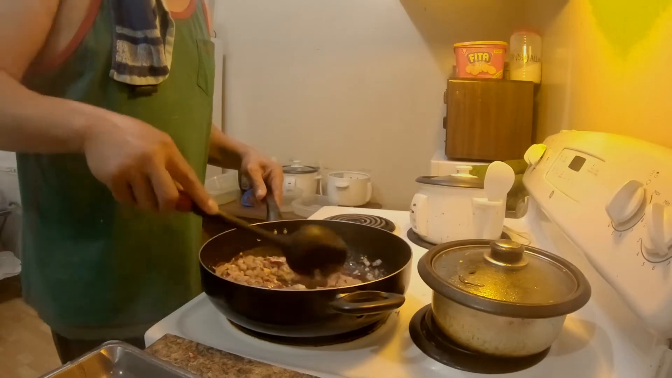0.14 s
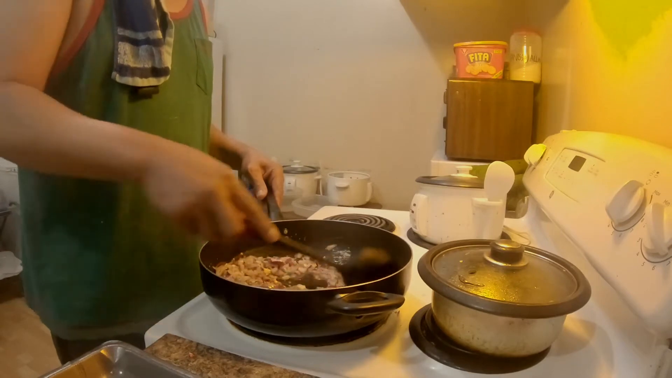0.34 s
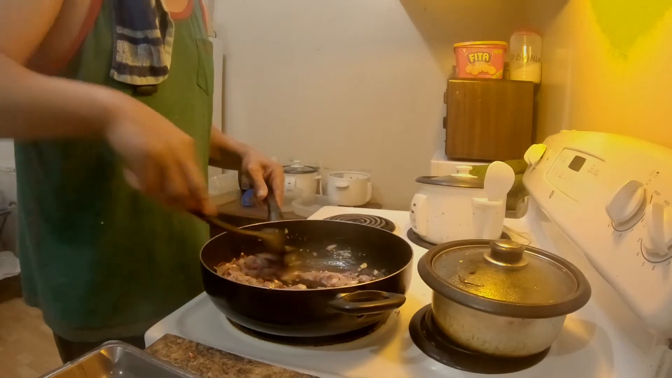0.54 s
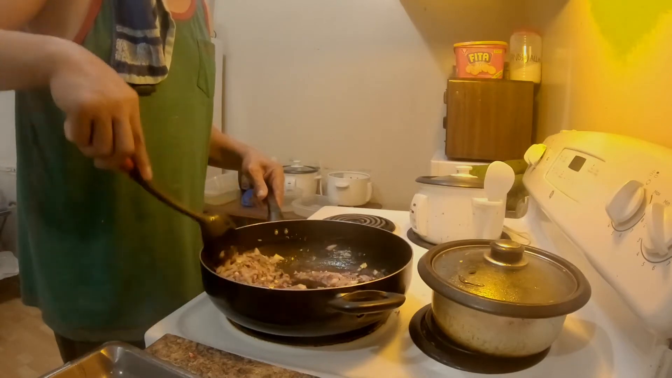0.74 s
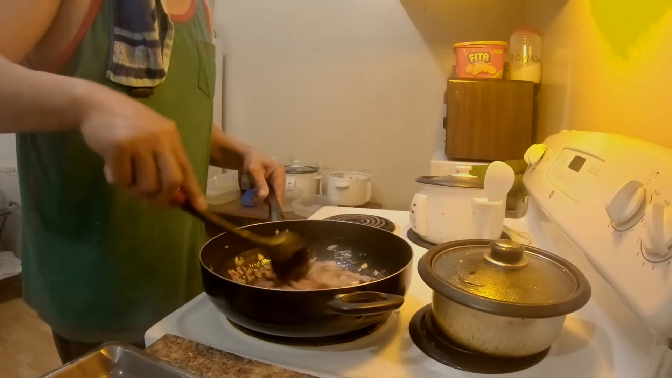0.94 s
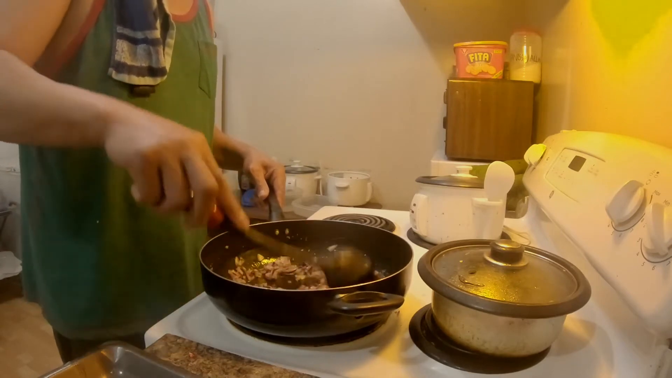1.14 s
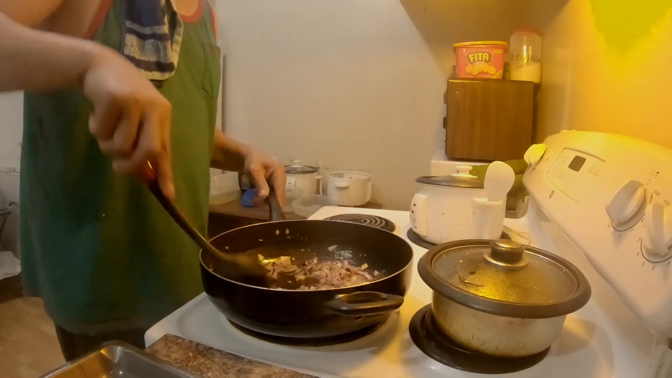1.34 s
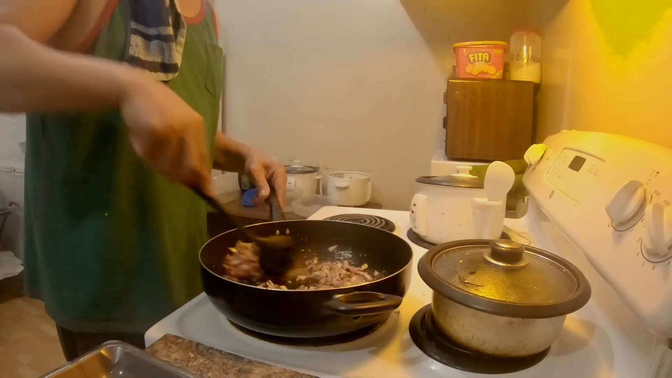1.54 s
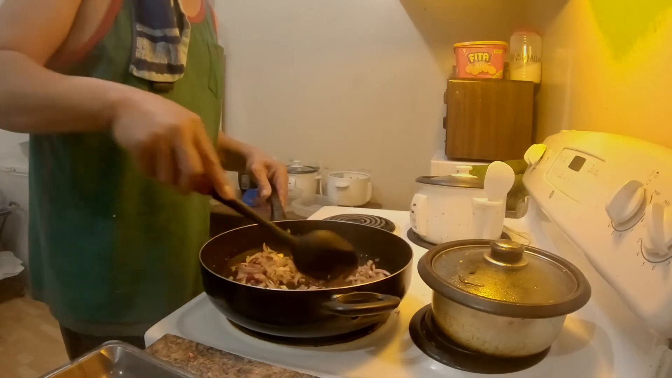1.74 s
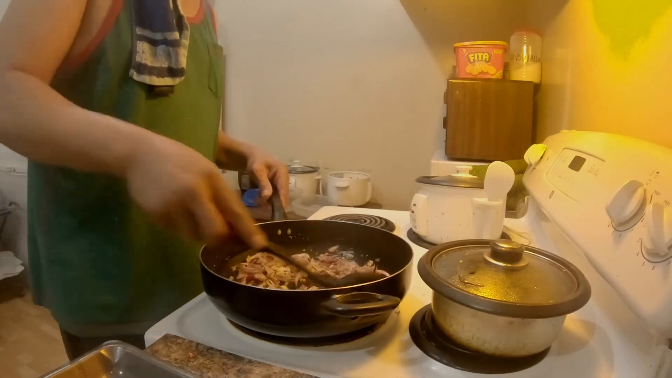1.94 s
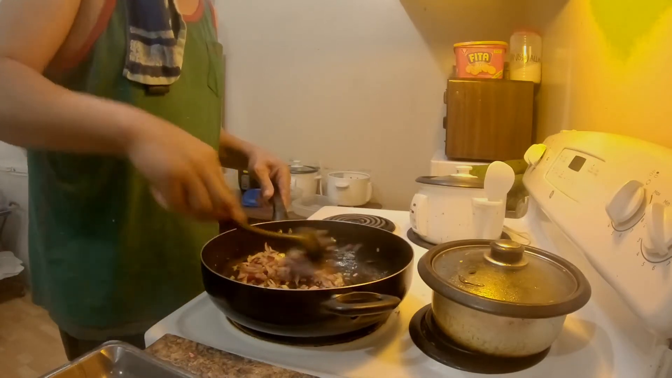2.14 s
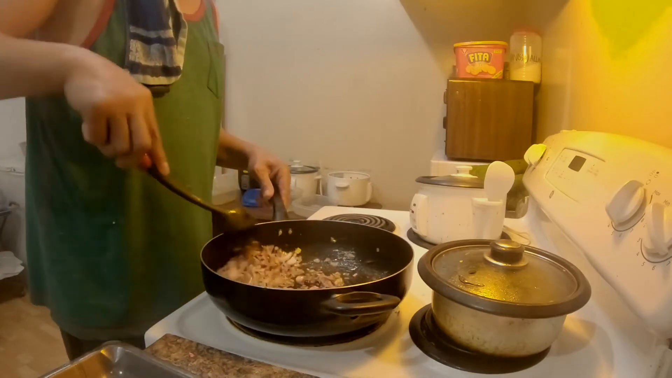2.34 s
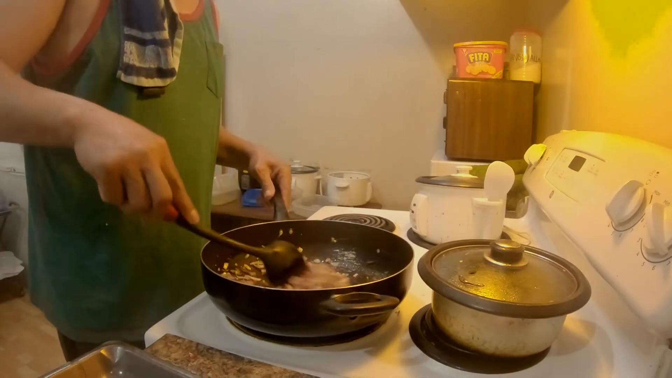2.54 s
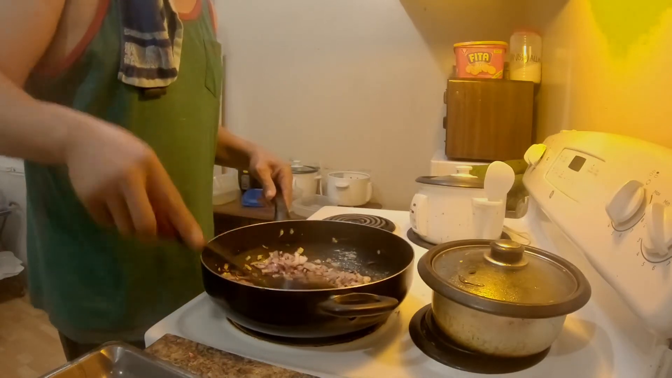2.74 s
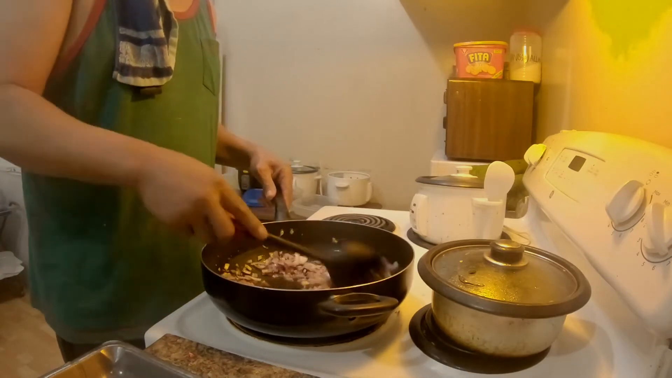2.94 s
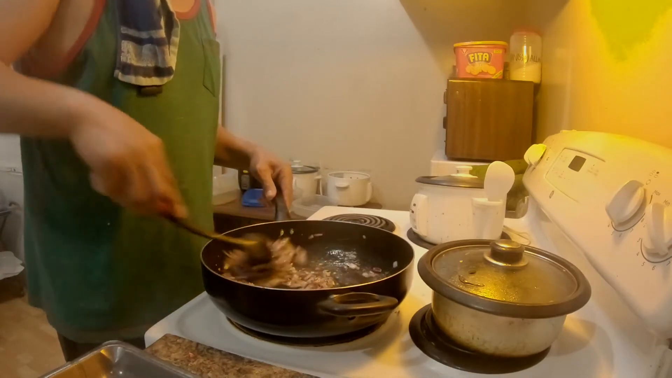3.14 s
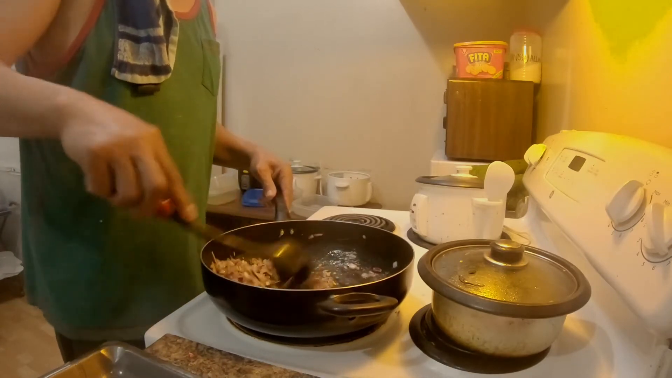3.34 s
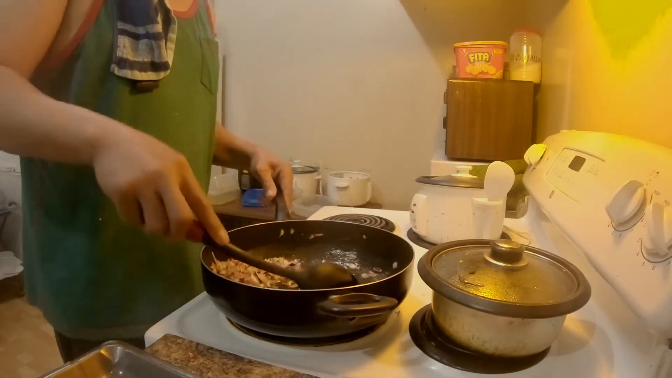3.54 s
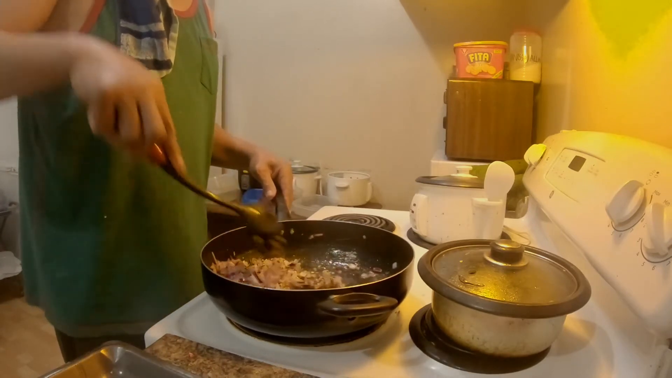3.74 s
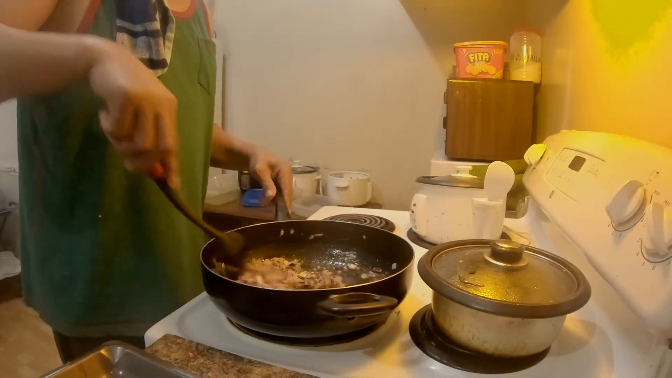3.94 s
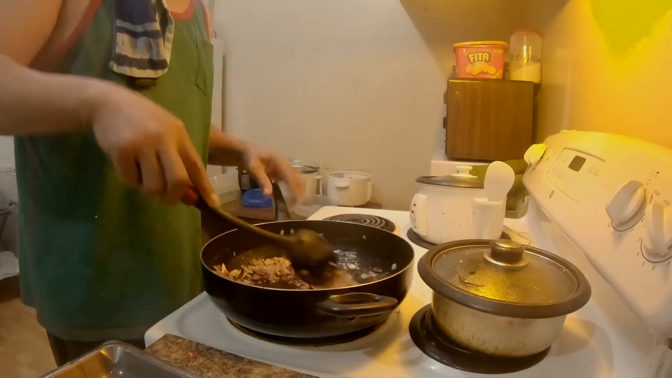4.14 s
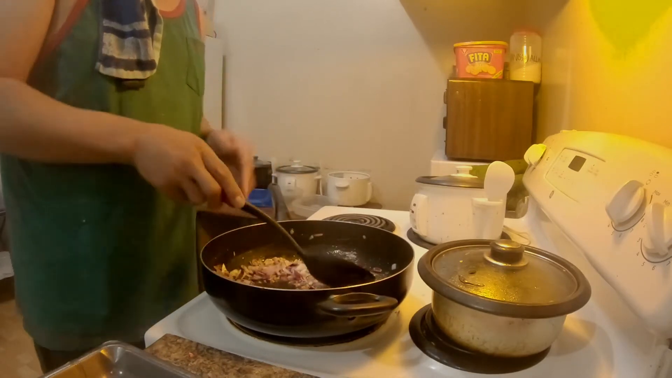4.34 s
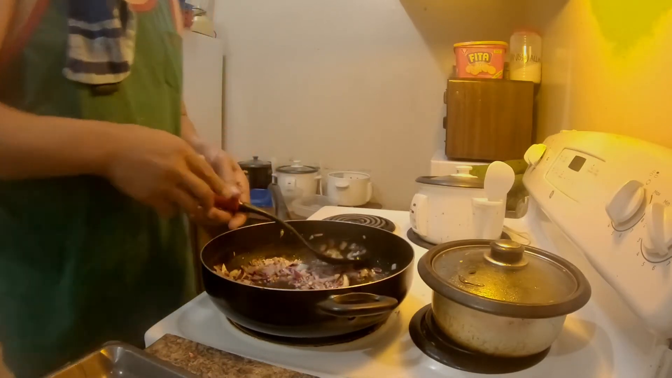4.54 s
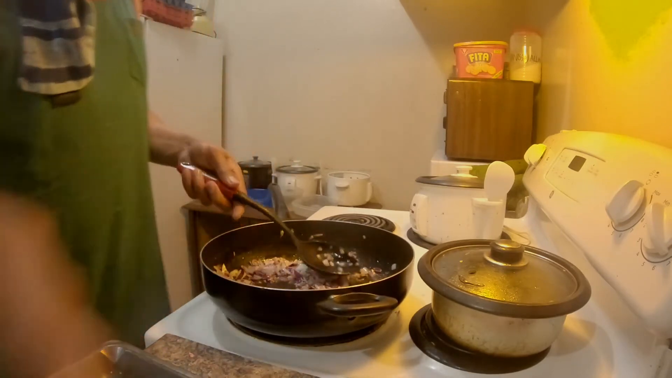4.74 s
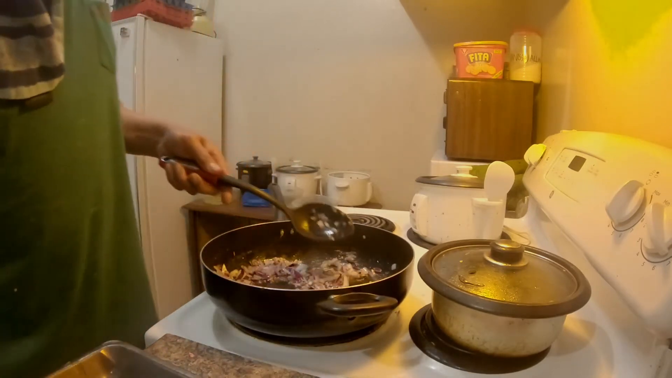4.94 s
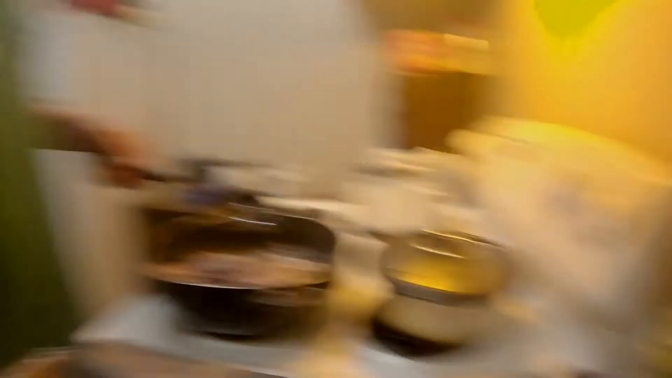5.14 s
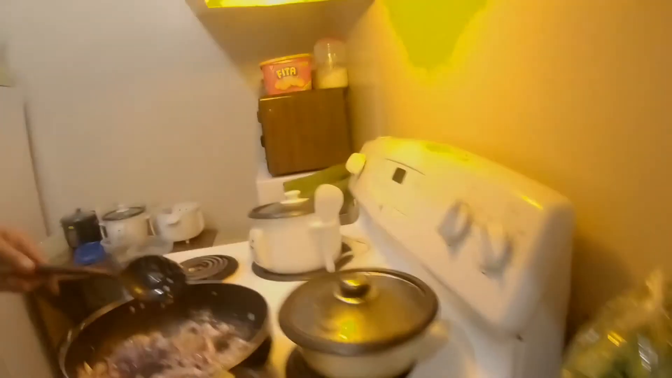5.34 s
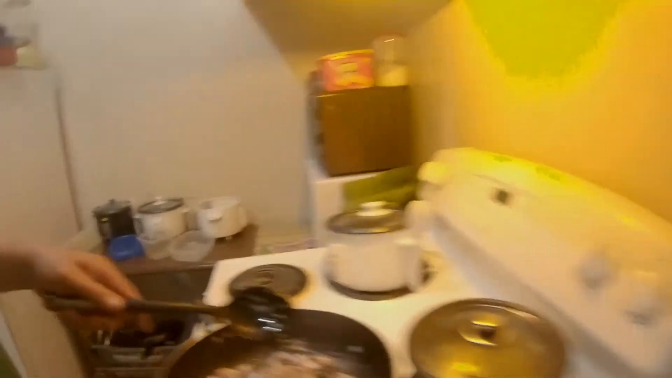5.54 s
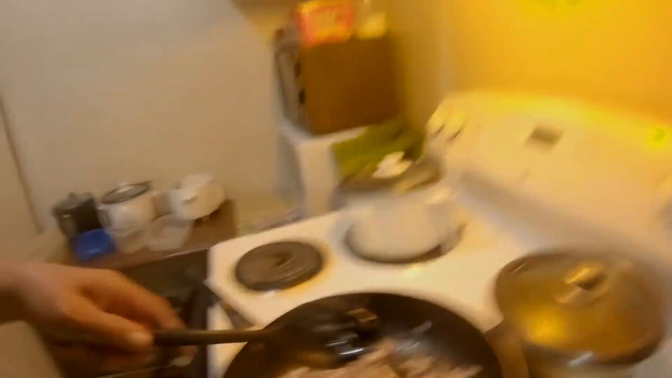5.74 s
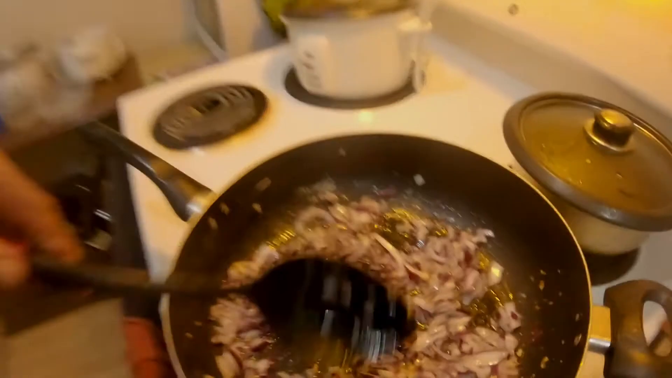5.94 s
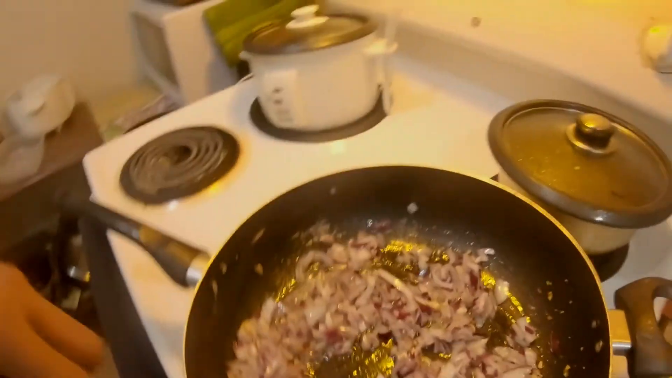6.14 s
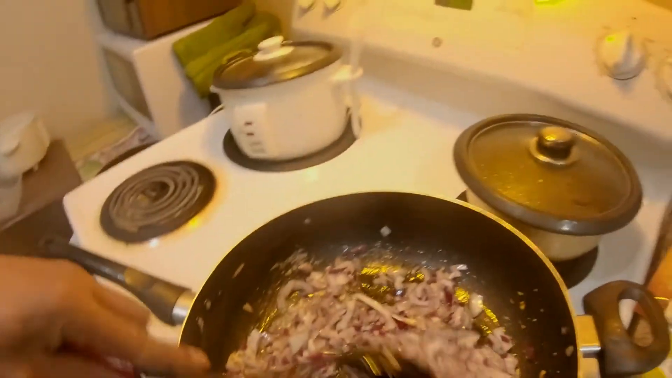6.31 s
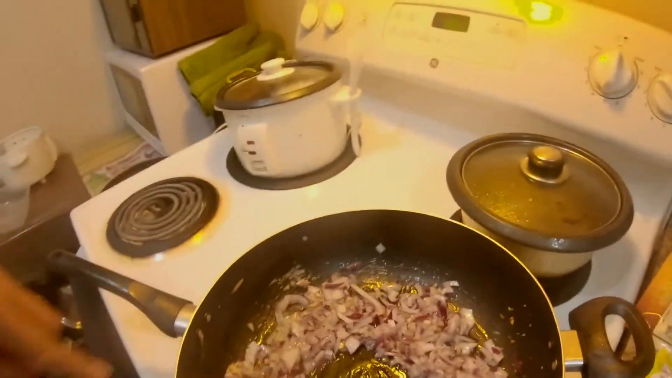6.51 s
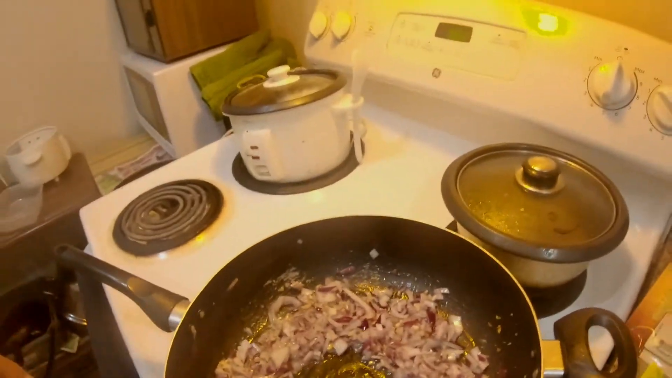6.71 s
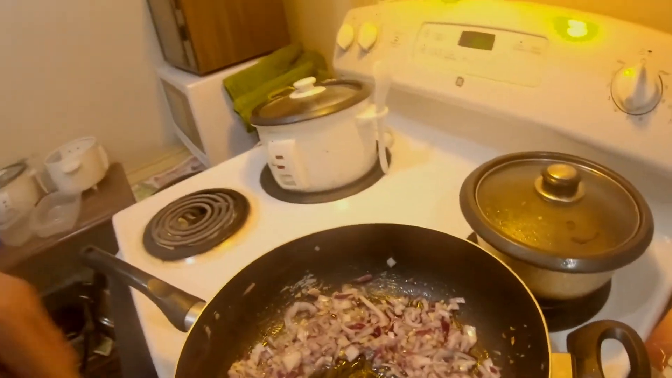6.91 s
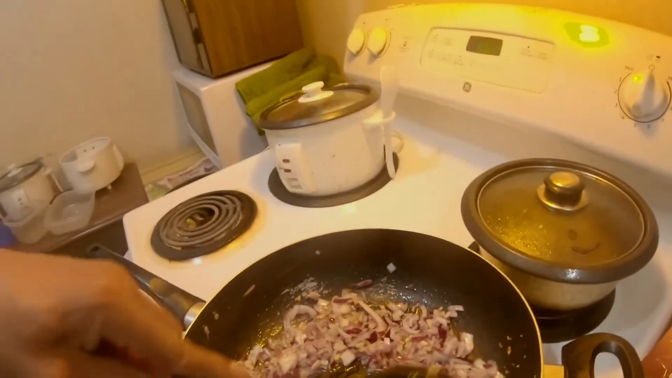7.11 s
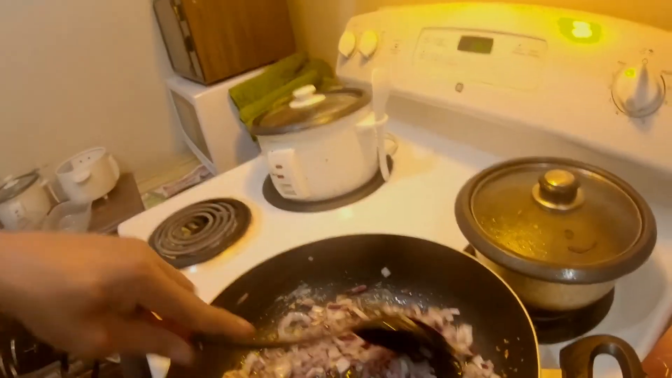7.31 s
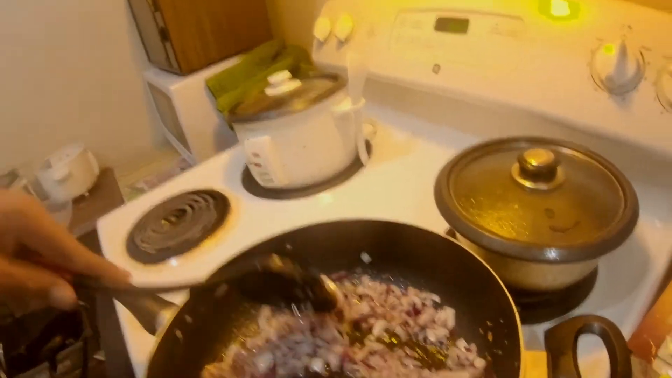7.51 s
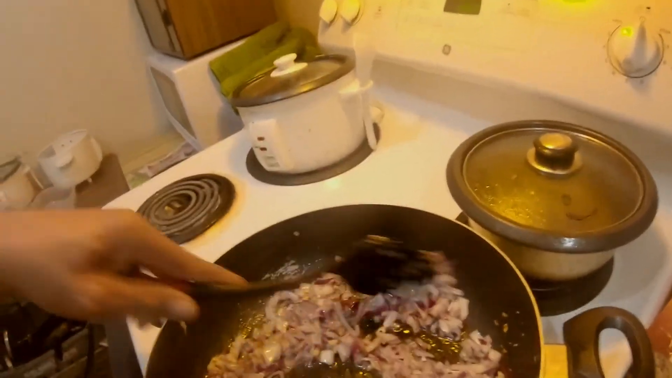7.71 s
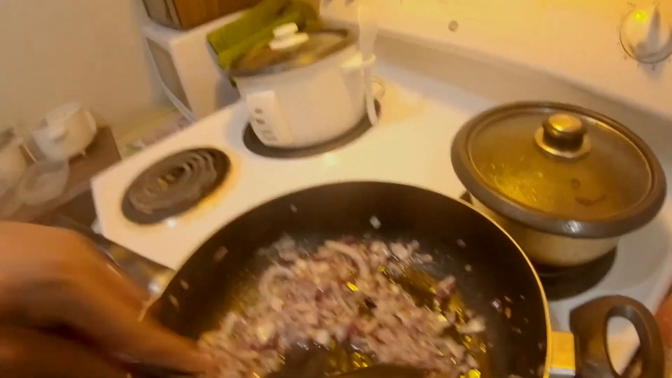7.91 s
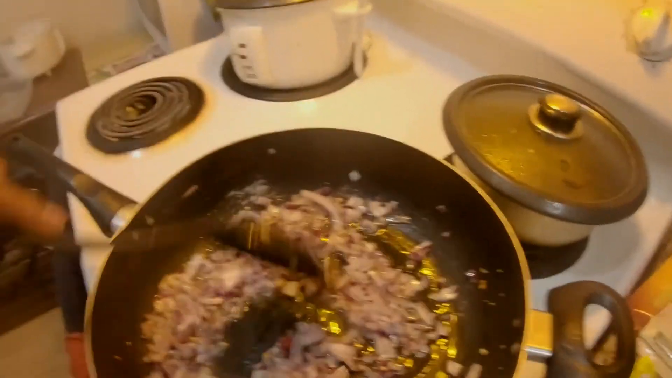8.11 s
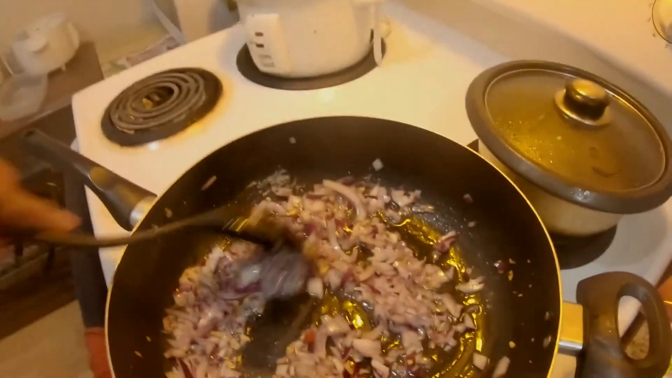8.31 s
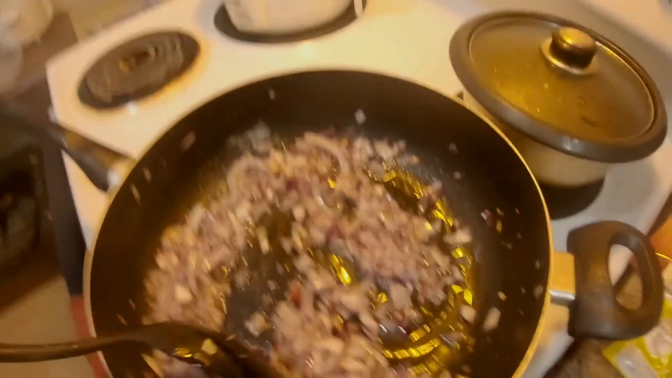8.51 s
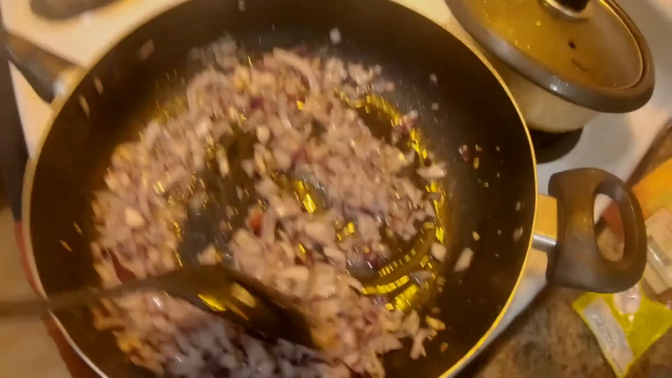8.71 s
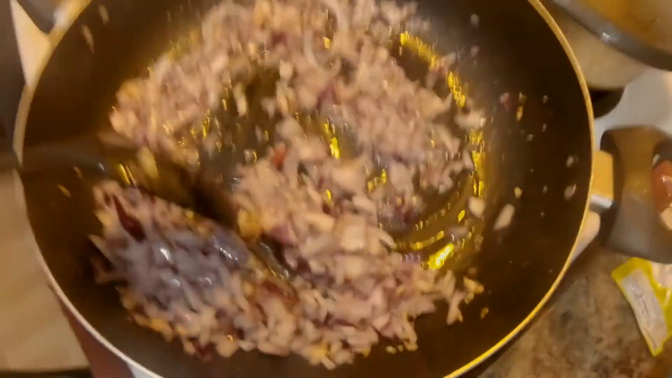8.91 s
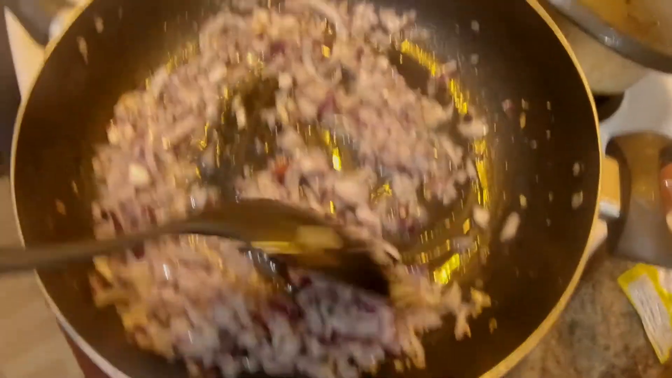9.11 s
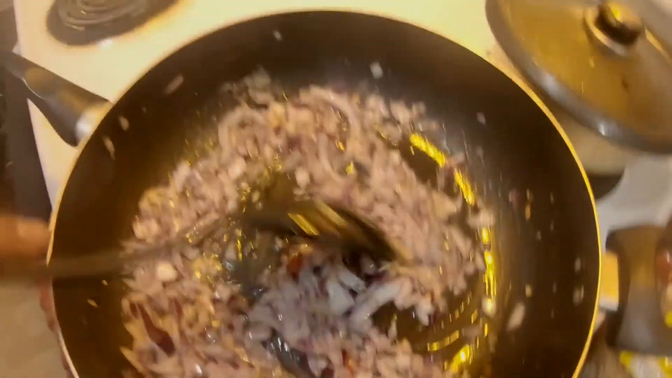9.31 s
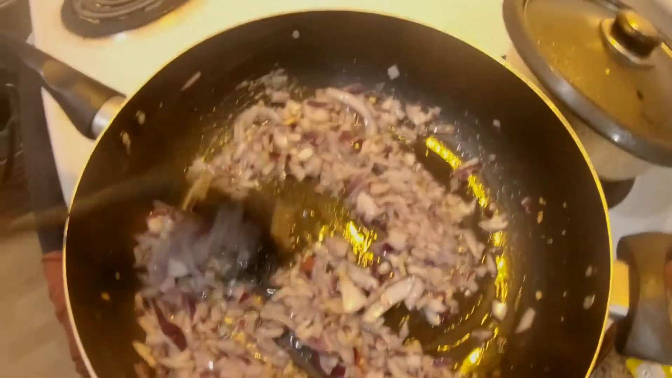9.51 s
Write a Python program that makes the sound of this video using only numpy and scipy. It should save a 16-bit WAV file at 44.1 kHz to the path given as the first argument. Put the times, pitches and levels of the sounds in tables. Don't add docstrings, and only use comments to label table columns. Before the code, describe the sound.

Chopped onion fries in a pan close to a stereo microphone in a small kitchen. Dense fizz, crackles and sharp oil pops continue throughout as a spoon scrapes and taps the metal. A fan drones low behind. Around the middle, the camera is lifted with a hard knock, a short creak and hand rumble, and the top of the sizzle dulls briefly, then returns with more scraping and a loud final tap.

```python
import sys
import numpy as np
from scipy import signal
from scipy.fft import rfft, irfft, next_fast_len
from scipy.io import wavfile
from scipy.ndimage import uniform_filter1d

SR = 44100
rng = np.random.default_rng(int(sys.argv[2]) if len(sys.argv) > 2 else 0)


def boost_factor(decibels):
    exponent = np.asarray(decibels, float) / 20
    return 10 ** exponent


def master(y):
    cut = np.clip(np.atleast_2d(y).T, -1, 1)
    pcm = np.round(cut * 32767)
    wavfile.write(sys.argv[1], SR, pcm.astype(np.int16))


N = 426006
TIME = np.arange(N) / SR

# (time [s], fizz level [dB])
BOIL = [(0.0, -39.5), (0.59, -41.5), (1.18, -42), (1.58, -41), (1.99, -44.5), (2.42, -40.5), (2.75, -43),
        (3.95, -42.5), (4.25, -45.5), (4.71, -47), (5.56, -47.5), (5.8, -45.5), (6.32, -45), (7.4, -42.5),
        (8.2, -42.5), (8.55, -40.5), (9.28, -43), (9.66, -41)]
# (time [s], loss [dB])
PORT_SHADE = [(0.0, -2.5), (1.5, 0), (5.0, 0.5), (5.3, 2), (5.44, 5), (5.48, 17), (5.84, 17), (5.88, 10),
              (6.05, 12), (6.25, 18), (6.45, 11), (6.52, 4), (9.66, 3)]
# (frequency [Hz], density [dB per Hz])
FIZZ_COLOUR = [(3200, -29.5), (3900, -8.5), (4440, -3), (5230, 0.5), (5840, -5), (7230, -16.5), (8290, -19),
               (10600, -31.5), (11500, -36), (13000, -65)]
# (frequency [Hz], density [dB per Hz])
HISS_COLOUR = [(200, -30), (300, -12), (400, -7.5), (570, -21), (760, 2.5), (1000, -3), (1700, -0.5),
               (2300, -1.5), (3600, -1), (4600, -23)]
# (frequency [Hz], density [dB per Hz])
AIR_COLOUR = [(6180, -51), (10500, -25.5), (10900, -31), (11600, -5), (12200, -0.5), (14300, -9),
              (15700, -14.5)]
# (frequency [Hz], density [dB per Hz])
WIDE_COLOUR = [(30, -19), (300, -22), (1000, -22.5), (3000, -23), (5000, -23), (8000, -20),
               (11000, -35)]
AIR_DB = -12.5


def sizzle():
    surge = flicker(1.0, 0.0091) * flicker(1.0, 0.097)
    noise = rng.standard_normal((5, N))
    heat, shade = curve(BOIL), curve(PORT_SHADE)
    low, high = bubbles(1178, 6470, count=10), bubbles(6280, 15700, count=8)

    bursts = 0.5 * low + 1.2 * high
    fizz = boost_factor(heat - 0.26) * coloured(bursts + 1.46 * noise[0], FIZZ_COLOUR)

    rim_loss_db = -2 * lifted(7.6, 1.2)
    palm_db = -8 * np.exp(-((TIME - 5.59) / 0.1) ** 4)
    hiss_db = -50 + 0.6 * (heat + 43) - 0.45 * shade + rim_loss_db + palm_db
    hiss = boost_factor(hiss_db) * coloured(0.27 * low + 1.23 * noise[1], HISS_COLOUR)

    left = 0.53 * high + 0.8 * noise[2]
    other = 0.4 * bubbles(10000, 14400, count=4) + 0.84 * noise[3]
    same = 0.31
    right = same * left + np.sqrt(1 - same ** 2) * other
    lean_db = np.array([[1.75], [-1.75]])
    air = boost_factor(heat + AIR_DB - shade + 1.9 + lean_db) * coloured(np.array([left, right]), AIR_COLOUR)

    gap = boost_factor(heat - 34.5) * flicker(6.1, 0.066) * coloured(noise[4], WIDE_COLOUR)
    return surge * (fizz + hiss + air) + np.array([[1], [-1]]) * gap


def bubbles(lo_hz, hi_hz, count):
    out = np.zeros(N)
    for hz in np.geomspace(lo_hz, hi_hz, count):
        grain = ring(hz, t60=14 / hz, rise_s=0.00005)[:600] * np.sqrt(hz)
        bursts = clicks(5000 / count, spread_db=2.5)
        out += signal.oaconvolve(bursts, grain)[:N]
    return evened(out)


def crackle():
    t = np.arange(600) / SR
    snaps = np.zeros(N)
    for puff in rng.standard_normal((3, 600)):
        tail = puff * boost_factor(-60 * t / 0.014)
        snaps += signal.oaconvolve(clicks(20, spread_db=3.0), tail)[:N]
    fizz = coloured(snaps, FIZZ_COLOUR)
    hiss = boost_factor(-8.0) * coloured(snaps, HISS_COLOUR)
    air = boost_factor(AIR_DB - curve(PORT_SHADE)) * coloured(snaps, AIR_COLOUR)
    return boost_factor(curve(BOIL) - 13) * (fizz + hiss + air)


# (time [s], peak level [dB], pitch [Hz], top against it [dB])
DROPS = [(0.1655, -24, 5130, -24), (0.8165, -18, 5190, -27), (1.1707, -22, 4760, -27),
         (1.9445, -28, 4840, -28), (2.0467, -27, 5150, -27), (2.1001, -31, 5110, -21),
         (2.139, -22, 4980, -34), (2.3176, -32, 5040, -23), (2.393, -31, 5000, -21),
         (2.4503, -31, 5170, -21), (2.5426, -27, 5380, -26), (2.833, -23, 5130, -27),
         (2.9128, -27, 4950, -26), (2.9791, -27, 5000, -17), (3.894, -30, 5370, -24),
         (3.9639, -30, 5020, -21), (4.0352, -28, 5090, -18), (4.0861, -25, 4830, -27),
         (4.1295, -28, 4850, -26), (4.4283, -31, 5170, -25), (4.9107, -33, 5770, -25),
         (5.1158, -31, 4720, -23), (5.1926, -22, 4610, -31), (5.2679, -28, 4750, -25),
         (5.3408, -33, 5070, -22), (5.3737, -31, 6040, -23), (5.5982, -27, 5510, -25),
         (5.685, -28, 5340, -27), (5.8681, -28, 5160, -22), (6.0028, -31, 4610, -24),
         (6.0911, -15, 4850, -30), (6.1644, -31, 5220, -22), (6.2612, -29, 4800, -19),
         (6.3944, -30, 4590, -23), (6.5555, -31, 5270, -23), (6.6253, -26, 5190, -20),
         (6.8708, -27, 5280, -15), (6.9262, -30, 4910, -27), (7.1816, -27, 4860, -18),
         (7.3652, -24, 5560, -30), (7.7169, -25, 5410, -21), (7.87, -26, 5340, -19),
         (7.9798, -26, 5240, -26), (8.3, -28, 4880, -18), (8.4253, -25, 5460, -24),
         (9.2753, -27, 5350, -26), (9.3531, -28, 5250, -19), (9.4654, -23, 5510, -26)]


def pops():
    out = np.zeros(N)
    for s, db, hz, _ in DROPS:
        bright = ring(hz, 0.007, 0.00015) + 0.4 * ring(0.87 * hz, 0.007, 0.00015)
        crack = 0.24 * ring(0.605 * hz, 0.0039, 0.0002)
        add(out, s, boost_factor(db - 0.6) * (bright + crack))
    return out


def spits():
    out = np.zeros(N)
    mids, t = puffs(len(DROPS), 3500, 6500)
    tops, t = puffs(len(DROPS), 6500, 8800)
    for (s, db, _, top_db), mid, top in zip(DROPS, mids, tops):
        spray = boost_factor(-13 - 60 * t / 0.022) * mid
        spray += boost_factor(top_db + 4 - 60 * t / 0.008) * top
        add(out, s, boost_factor(db) * spray)
    return out


# (start [s], length [s], level [dB], dull part against it [dB], loaded spot [Hz])
DRAGS = [(-0.2, 0.36, -43, -11, 1560), (0.34, 0.36, -41, -11, 1300), (1.25, 0.37, -44, -9, 1450),
         (2.4, 0.32, -49, -3, 1500), (5.33, 0.2, -43, -18, 1500), (5.65, 0.15, -39, -23, 1770),
         (5.84, 0.18, -41, -8, 1900), (6.0, 0.25, -46, -10, 1200), (6.25, 0.2, -45, -12, 2000),
         (6.49, 0.135, -26, -4, 1850), (6.54, 0.06, -31, -25, 2600), (7.0, 0.28, -48, -20, 1550),
         (7.36, 0.19, -42, -1, 1400), (7.7, 0.3, -36, -17, 1350), (8.6, 0.22, -43, -11, 1190),
         (8.76, 0.3, -43, -6, 1300), (9.535, 0.07, -27, -5, 1350)]
# (start [s], length [s], level [dB], dull part against it [dB], loaded spot [Hz])
LANDING_SKIDS = [(0.812, 0.13, -29.5, -9, 1900), (2.11, 0.13, -41, -20, 1400), (2.83, 0.16, -48, 5, 1300),
                 (3.08, 0.16, -41, 0, 1150), (5.2, 0.08, -22, -8, 1450), (5.485, 0.06, -54, 16, 1400),
                 (6.38, 0.2, -35, -11, 1750), (6.585, 0.09, -35, -7, 1800), (6.86, 0.22, -36, -5, 1400),
                 (8.45, 0.12, -33, 2, 1450), (9.465, 0.05, -47, 14, 1100)]
# (frequency [Hz], width [Hz], level [dB])
BRIGHT_METAL = [(1120, 86, 3), (1256, 28, 3), (1650, 99, -3), (1890, 170, -2), (2160, 76, -4)]
# (frequency [Hz], width [Hz], level [dB])
DULL_METAL = [(380, 50, 0), (470, 70, -3), (666, 120, 0)]


def scrape():
    slips = 0.45 * evened(clicks(1500, spread_db=3.2)) + 0.94 * rng.standard_normal(N)
    slips = lowpass(slips * flicker(2.1, 0.02), 3000, order=3)

    press = boost_factor(-59 + 11 * lifted(6.0, 0.7))
    weight = boost_factor(-59)
    total, spot = press, press * 1500

    for rows, top, lead in ((DRAGS, 0.7, 0.14), (LANDING_SKIDS, 0.12, 0)):
        for start, length, db, dull_db, hz in rows:
            push = pressure(start, length, db, top)
            dull_push = pressure(start - lead * length, length, db + dull_db, top)
            press, weight = np.hypot(press, push), np.hypot(weight, dull_push)
            total, spot = total + push, spot + push * hz

    bright = 0.51 * body(slips, BRIGHT_METAL)
    bright += 0.43 * moving_ring(slips, spot / total, width=385)
    bright += 0.28 * body(slips, [(1400, 800, 0)])
    bounce = around(KNOCKS, early_s=0.04, late_s=0.006, db=-10)
    return bounce * boost_factor(-4) * (press * bright + weight * body(slips, DULL_METAL))


def pressure(start, length, db, top):
    u = (TIME - start) / length
    away = np.maximum((top - u) / top, (u - top) / (1 - top))
    return boost_factor(db - 18 * np.minimum(away, 6))


def around(events, early_s, late_s, db):
    gain = np.ones(N)
    for row in events:
        gain[(TIME > row[0] - early_s) & (TIME < row[0] + late_s)] = boost_factor(db)
    return uniform_filter1d(gain, size=200)


def moving_ring(x, hz, width):
    turn = np.exp(2j * np.pi * np.cumsum(hz) / SR)
    r = np.exp(-np.pi * width / SR)
    smooth = x / turn
    for _ in range(2):
        smooth = signal.lfilter([1 - r], [1, -r], smooth)
    return evened((turn * smooth).real)


# (time [s], peak level [dB], main tone [Hz], clack against it [dB], spatter against it [dB])
KNOCKS = [(0.817, -27, 600, -5, 5), (1.393, -38, 1257, -10, -7), (2.12, -39.5, 1300, -4, 2),
          (2.833, -31.5, 716, -8, -1), (3.084, -34, 806, -9, -15), (5.167, -39, 415, -5, -17),
          (5.192, -12, 450, -10, -17), (5.276, -27, 900, -14, -20), (5.491, -27, 350, -30, -24),
          (5.868, -29, 306, -14, -4), (5.884, -26, 480, -8.5, -17), (6.003, -27, 290, -12, -12),
          (6.09, -42.5, 1380, 1, 5), (6.202, -33.5, 292, -26, -16), (6.872, -28, 1230, -4.5, -18),
          (7.364, -27, 445, -4, -4), (8.459, -26, 600, -12, 6), (8.975, -36.5, 298, -17, -13),
          (9.4655, -12, 430, -28, -15)]
# (frequency [Hz], level [dB])
PAN_MODES = [(340, -7), (440, -8.5), (560, -4), (690, -9), (860, -8)]
# (frequency [Hz], level [dB])
RIM_MODES = [(1020, 2), (1300, 0.5), (1620, -9), (1900, 3.5), (2320, -4), (2650, -45.5), (3150, -23)]


def taps():
    out, count = np.zeros(N), len(KNOCKS)
    luck = rng.standard_normal((count, len(PAN_MODES) + len(RIM_MODES), 2))
    thuds, t = puffs(count, 350, 1220)
    cracks, t = puffs(count, 900, 2300)
    spatters, t = puffs(count, 3050, 6800)
    for k, (s, db, tone_hz, clack_db, spatter_db) in enumerate(KNOCKS):
        t60 = 0.07 - 0.0008 * (db + 40)
        swell = boost_factor(-60 * t / (0.83 * t60)) * (1 - np.exp(-t / 0.0013))
        low = 0.96 * ring(tone_hz, t60, 0.00051)
        low += 0.51 * struck(PAN_MODES, luck[k], 0.87 * t60, 0.00047)
        low += 0.38 * thuds[k] * swell
        clack = 0.8 * struck(RIM_MODES, luck[k, len(PAN_MODES):], 0.81 * t60, 0.00025)
        clack += 0.68 * cracks[k] * boost_factor(-60 * t / 0.04)
        spatter = boost_factor(spatter_db - 9.5) * spatters[k] * swell
        add(out, s, boost_factor(db) * (low + boost_factor(clack_db + 6.0) * clack + spatter))
    return out


def struck(modes, draw, t60, rise_s):
    sound = 0
    for (hz, db), (a, b) in zip(modes, draw):
        tone = ring(hz * (1 + 0.056 * b), t60 * (700 / hz) ** 0.4, rise_s)
        sound = sound + boost_factor(db + 3.5 * a) * tone
    return sound / abs(sound).max()


# (time [s], peak level [dB], frequency [Hz], t60 [s], rise [s])
RINGS = [(0.817, -15, 5200, .016, .001), (2.833, -20, 5150, .014, .0005),
         (5.5982, -26, 5600, .012, .0003), (6.0915, -17, 4850, .012, .0003),
         (5.209, -12, 190, .05, .002), (5.291, -19, 200, .08, .003), (0.8155, -27, 1400, .03, .0003),
         (0.8155, -28, 1900, .03, .0003), (0.816, -28, 2300, .03, .0003),
         (0.8175, -11.5, 710, .045, .004), (0.829, -30, 1030, .08, .002), (5.196, -17, 1290, .03, .001),
         (5.237, -24, 1900, .03, .001), (5.259, -28, 1250, .03, .001), (5.2812, -1, 240, .012, .0008),
         (5.245, -30, 2000, .06, .004), (5.256, -29, 2250, .04, .003), (5.875, -22, 560, .05, .004),
         (5.8855, -11, 140, .09, .003), (5.887, -17, 290, .05, .003), (5.944, -30, 1100, .05, .005),
         (8.4645, -23, 620, .03, .0005), (8.477, -30, 1700, .02, .0003), (8.4825, -24, 650, .04, .0005),
         (9.4655, -23, 1750, .025, .0003), (9.4658, -18, 680, .03, .0004), (9.479, -30, 1650, .03, .001),
         (9.488, -24, 700, .025, .001), (9.547, -32, 1350, .03, .001), (9.548, -28, 750, .1, .006),
         (9.564, -26, 650, .06, .004)]


def bounces():
    out = np.zeros(N)
    for s, db, hz, t60, rise_s in RINGS:
        add(out, s, boost_factor(db) * ring(hz, t60, rise_s))
    return out


# (time [s], peak level [dB], frequency [Hz], rattle against it [dB], t60 [s])
HOUSING_BLOWS = [(5.15, -30, 127, -13, 0.12), (5.171, -26.5, 147, -2, 0.12), (5.1936, 0, 275, -9, 0.035),
                 (5.202, -8.5, 135, -14, 0.088), (5.213, -11, 122, -19, 0.062), (5.243, -30, 91.5, 0, 0.1),
                 (5.28, -13.5, 141, -6, 0.064), (5.309, -22, 136.4, -27, 0.2), (5.489, -27, 150, 1, 0.12),
                 (5.7, -32, 124, -11, 0.15), (5.871, -17, 132, -19, 0.15), (5.952, -18.5, 150, -28, 0.074),
                 (6.004, -17.5, 151, -14, 0.079), (6.154, -33, 141, -7, 0.065),
                 (6.204, -27.5, 134, -16, 0.18), (6.669, -25.5, 145, -15, 0.08),
                 (8.055, -30, 116, -9, 0.14), (8.084, -25.5, 205, -14, 0.11),
                 (8.099, -23.5, 116, -8, 0.096), (8.127, -28.5, 128, -19, 0.1), (8.659, -42, 229, 5, 0.13),
                 (8.836, -25, 185, -11, 0.11), (8.914, -22.5, 160, -16, 0.15),
                 (8.974, -13, 136, -18.5, 0.11)]


def housing():
    out = np.zeros(N)
    rattles, t = puffs(len(HOUSING_BLOWS), 320, 540)
    for (s, db, hz, rattle_db, t60), noise in zip(HOUSING_BLOWS, rattles):
        swell = boost_factor(-60 * t / (0.68 * t60)) * (1 - np.exp(-t / 0.0022))
        rattle = boost_factor(rattle_db - 6.5) * noise * swell
        add(out, s, boost_factor(db + 6) * (ring(hz, t60, 0.0031) + rattle))
    return out


# (frequency [Hz], width [Hz], level [dB])
PLASTIC = [(1060, 150, 1), (1300, 110, 4), (1600, 130, -4), (1910, 89, 5), (2290, 99, 1), (4600, 180, -13)]


def creak():
    out, length = np.zeros(N), 0.036
    t = np.arange(int(0.08 * SR)) / SR
    u = t / length
    push = np.clip(u, 0, 1) ** 0.4 * np.clip((1 - u) / 0.28, 0, 1)
    rub = push * rng.standard_normal(len(t))
    bite = np.clip((t - 0.014) / 0.006, 0.1, 1)
    sound = boost_factor(-1) * body(rub, PLASTIC[:3]) + 0.7 * body(rub * bite, PLASTIC[3:])
    add(out, 5.199, boost_factor(-23.5) * sound)
    return out


def kitchen(x):
    t = np.arange(SR // 2) / SR
    tail = clicks(2800, 0, size=len(t)) * boost_factor(-60 * t / 0.3) * (t > 0.004)
    tail = signal.lfilter(*signal.butter(1, 2200, fs=SR), tail)
    return signal.fftconvolve(x, tail / np.linalg.norm(tail))[:N]


# (time [s], reach [s], level [dB], deep part [dB])
STIR_SHAKES = [(0.0, 0.2, -39, -51), (0.55, 0.18, -41, -49), (0.88, 0.1, -36, -52), (1.33, 0.15, -41, -52),
               (1.8, 0.2, -45, -56), (2.13, 0.22, -41, -50), (2.6, 0.09, -40, -47), (2.86, 0.11, -39, -44),
               (3.35, 0.14, -46, -61), (3.8, 0.3, -47, -57), (4.25, 0.12, -42, -58), (4.65, 0.13, -44, -52),
               (4.87, 0.12, -43, -57), (5.25, 0.1, -55, -22), (5.44, 0.1, -41, -42), (5.6, 0.09, -56, -41),
               (5.76, 0.12, -40, -44), (5.93, 0.11, -44, -32), (6.2, 0.15, -46, -45), (6.7, 0.09, -45, -49),
               (6.95, 0.06, -46, -37), (7.21, 0.05, -54, -48), (7.42, 0.08, -43, -46),
               (7.85, 0.12, -50, -54), (8.13, 0.17, -50, -44), (8.5, 0.16, -48, -43), (8.8, 0.2, -40, -42),
               (8.99, 0.05, -34, -31), (9.15, 0.15, -46, -47), (9.42, 0.15, -54, -50)]
# (frequency [Hz], width [Hz], level [dB])
FAN_DRONE = [(115.7, 11.1, 2.5), (145, 16.6, -2.5), (190, 28.6, -7), (260, 113, -29.5)]
# (frequency [Hz], width [Hz], level [dB])
HAND_GRIP = [(125.5, 27.6, -4), (203.6, 56.7, -3.5), (340, 150, -10.5)]
# (frequency [Hz], density [dB per Hz])
DEEP_COLOUR = [(12, -36), (20, -9.5), (43, 4.5), (81, -1), (92, -9), (100, 2), (130, -14), (220, -120)]


def rumble():
    held = lifted(5.1, 0.087)
    noise = rng.standard_normal((3, N))
    fan = body(noise[0], FAN_DRONE)
    hand = body(noise[1] * flicker(2.5, 0.02), HAND_GRIP)
    low = lowpass((1 - held) * fan + held * hand, 420, order=2)
    level, deep = boost_factor(-45 - 3.5 * held), boost_factor(-65 + 6 * held)
    for s, reach, db, deep_db in STIR_SHAKES:
        swell = np.exp(-np.minimum(((TIME - s) / (0.7 * reach)) ** 2, 50))
        level, deep = np.hypot(level, boost_factor(db) * swell), np.hypot(deep, boost_factor(deep_db) * swell)
    return boost_factor(1.0) * level * low + deep * coloured(noise[2], DEEP_COLOUR)


def lifted(s, over_s):
    return np.clip((TIME - s) / over_s, 0, 1)


def evened(x):
    return x / np.sqrt(np.mean(x ** 2) + 1e-20)


def curve(rows):
    return np.interp(TIME, [r[0] for r in rows], [r[1] for r in rows])


def add(mix, s, sound):
    part = mix[round(s * SR):][:len(sound)]
    part += sound[:len(part)]


def lowpass(x, hz, order):
    return signal.sosfilt(signal.butter(order, hz, fs=SR, output="sos"), x)


def coloured(x, points):
    f, db = np.transpose(points)
    size = next_fast_len(N)
    hz = np.fft.rfftfreq(size, 1 / SR)
    gain = boost_factor(np.interp(np.log(hz + 1), np.log(f + 1), db, left=-120, right=-120))
    return evened(irfft(rfft(x, size) * gain, size)[..., :N])


def body(x, modes):
    out = 0
    for k, (hz, width, db) in enumerate(modes):
        mode = signal.lfilter(*signal.iirpeak(hz, hz / width, SR), x)
        out = out + (-1) ** k * boost_factor(db) * mode
    return evened(out)


def clicks(per_s, spread_db, size=N):
    db = spread_db * np.minimum(rng.exponential(1, size), 5)
    return boost_factor(db) * rng.standard_normal(size) * (rng.random(size) < per_s / SR)


def flicker(db, s):
    width = max(int(s * SR), 2)
    drift = uniform_filter1d(uniform_filter1d(rng.standard_normal(N), width), width)
    return boost_factor(db * evened(drift))


def ring(hz, t60, rise_s):
    t = np.arange(13230) / SR
    return boost_factor(-60 * t / max(t60, 0.002)) * (1 - np.exp(-t / rise_s)) * np.sin(2 * np.pi * hz * t)


def puffs(count, lo_hz, hi_hz):
    noise, t = rng.standard_normal((count, 13230)), np.arange(13230) / SR
    band = signal.butter(2, [lo_hz, hi_hz], "bandpass", fs=SR, output="sos")
    return evened(signal.sosfilt(band, noise)), t


def scene():
    blows, drops = taps() + bounces(), pops()
    room = boost_factor(-16.5) * kitchen(blows + drops)
    knocks = lowpass(blows + room + scrape() + housing() + creak(), 6500, order=4)
    drops = lowpass(drops, 9100, order=2)
    return sizzle() + crackle() + drops + spits() + knocks + rumble()


def band_limit(x):
    return signal.sosfilt(signal.butter(12, 15820, fs=SR, output="sos"), x)


def record(dry):
    edge = signal.firwin(255, 15840, window=("kaiser", 8), fs=SR)
    mix = signal.oaconvolve(dry, edge[None], "same")
    return band_limit(mix)


dry = scene()
out = record(dry)
master(out)
```